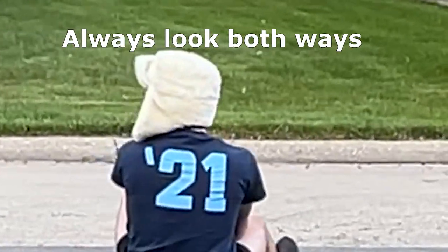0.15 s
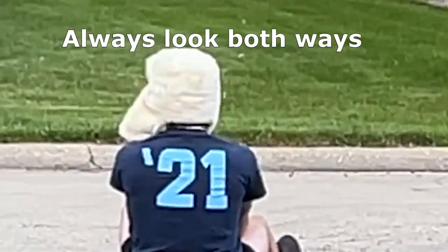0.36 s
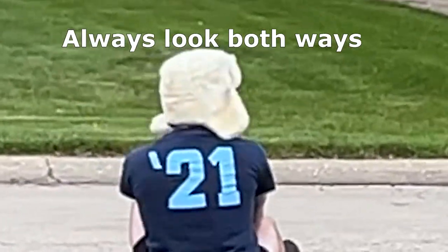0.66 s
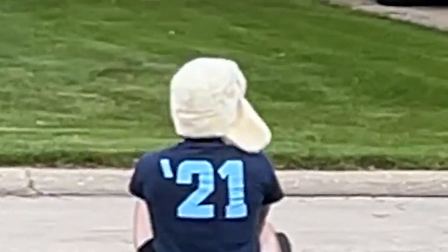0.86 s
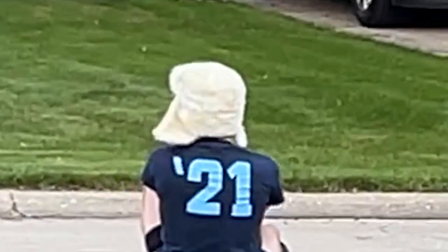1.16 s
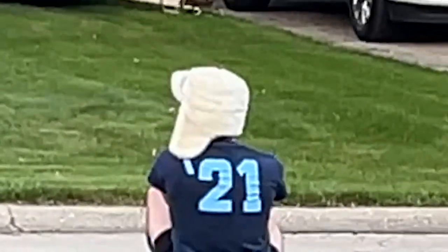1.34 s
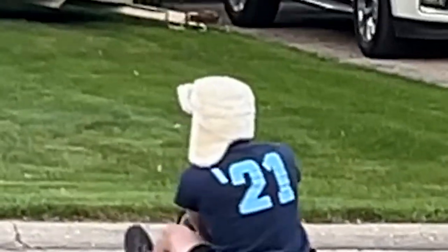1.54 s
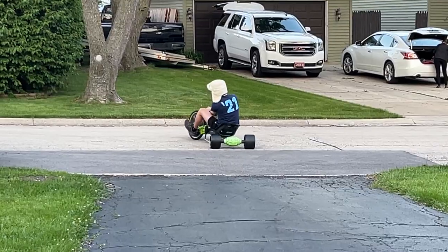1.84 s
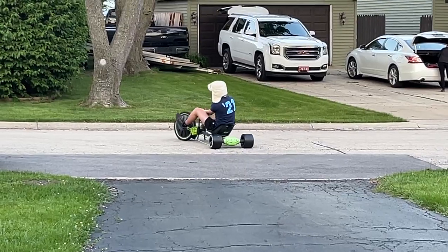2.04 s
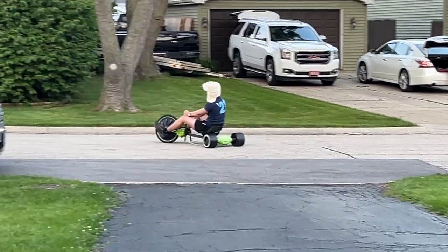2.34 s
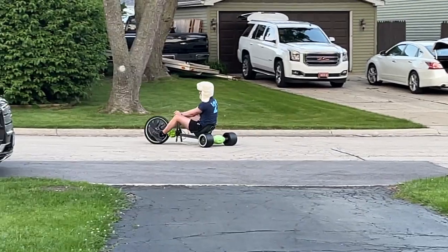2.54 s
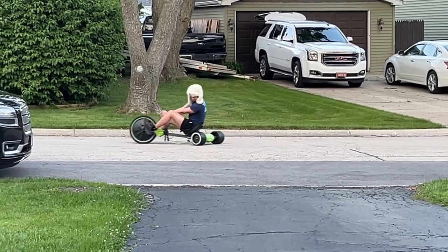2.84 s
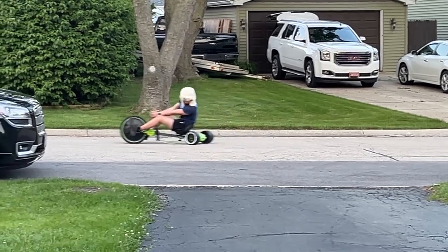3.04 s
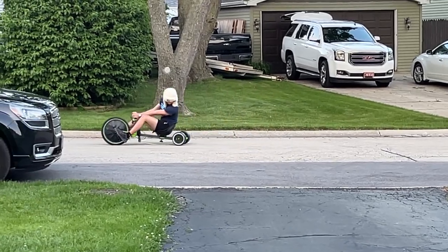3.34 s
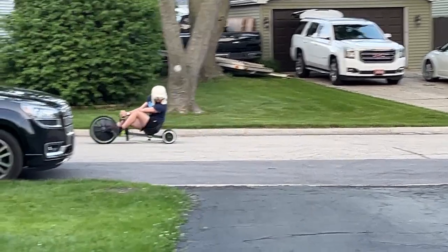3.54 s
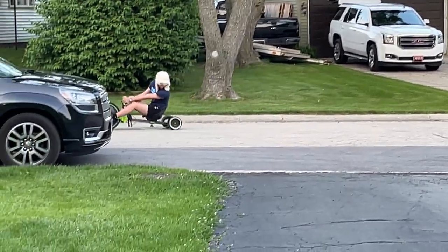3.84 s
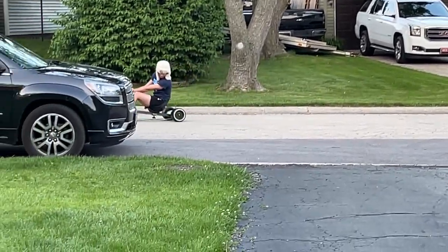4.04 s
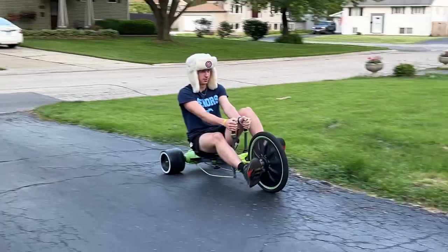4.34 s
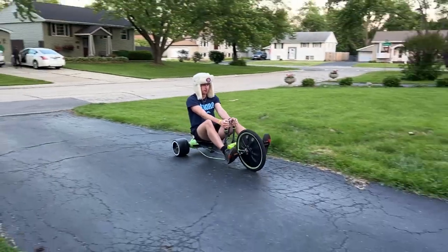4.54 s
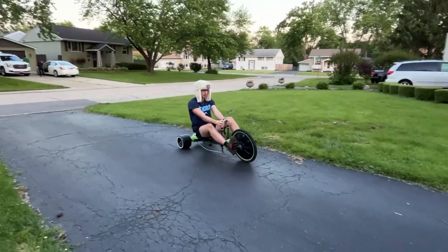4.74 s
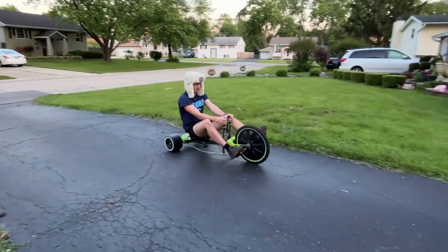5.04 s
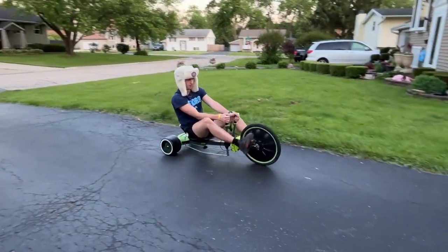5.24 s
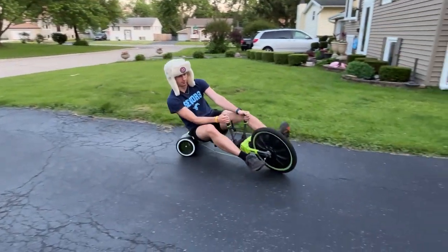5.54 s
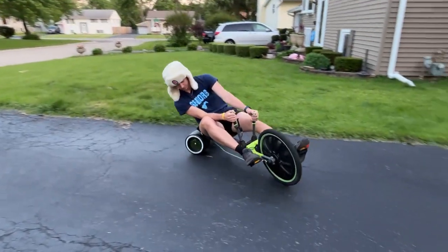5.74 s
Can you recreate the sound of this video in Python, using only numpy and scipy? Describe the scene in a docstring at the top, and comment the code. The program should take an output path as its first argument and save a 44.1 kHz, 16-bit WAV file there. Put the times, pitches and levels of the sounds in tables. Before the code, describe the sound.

Open air on a paved suburban street, heard in stereo over a dull, steady distant hush. From 0 s hard hollow plastic wheels roll with a gritty grind, stones ticking and snapping, one sharp crack at 0.3 s. A short skid with woody knocks comes around 0.8 s, more cracks around 1.3-1.6 s, and juddering scrapes with knocks at 1.8-2.3 s. The wheels then recede. Low gusts thump the microphone from 2.3 to 3.2 s, strongest near 3 s. A faint high rubbing squeak appears around 3.3 s, a bright plastic knock at 3.46 s, a hollow thump at 3.84 s, then near quiet. At 4.37 s the sound abruptly becomes close and loud: rough wheel roar, rattling frame and seat, scraping bursts near 4.8 and 5.0 s, hard cracks around 5.1 and 5.4 s. Hollow booming thumps and skidding grow, flattening into distortion until the end at about 5.9 s.

```python
"""On a paved street a low trike with hollow plastic wheels rolls away while gusts buffet the microphone.
Then, suddenly close, it grinds and skids through a turn on an asphalt driveway and overloads the microphone.
Random contacts ring the wheel shells into a roar, and patches of sand crunch; short noise bursts make
stones crack and wheel walls knock. Decaying tones make the wheel cavities thump, and low noise the wind."""
import sys
import numpy as np
from scipy import signal
from scipy.fft import rfft, irfft, next_fast_len
from scipy.io import wavfile
from scipy.ndimage import uniform_filter1d

SR = 44100
rng = np.random.default_rng(int(sys.argv[2]) if len(sys.argv) > 2 else 0)


def transcribe(signal):
    """Save signal, clipped to [-1, 1], as a 16-bit WAV file at the path in sys.argv[1]."""
    frames = np.atleast_2d(signal).T
    limited = np.clip(frames, -1, 1)
    pcm = np.round(limited * 32767).astype(np.int16)
    wavfile.write(sys.argv[1], SR, pcm)


N = 259660
TIME = np.arange(N) / SR
SIZE = next_fast_len(N + 16000)   # transform length, with spare room after the sound
CLOSE_S = 4.366   # the trike is close from here on

# Plain rolling of the wheel walls along the street. Each row: time in seconds, level in dB.
STREET_ROLL = [(0, -28.5), (0.7, -32.5), (1.05, -34), (1.6, -33), (1.78, -35.5), (2.35, -40.5),
               (2.62, -39.5), (3.3, -40.5), (4.35, -45)]
# Plain rolling of the wheel walls on the driveway. Each row: time in seconds, level in dB.
DRIVEWAY_ROLL = [(4.37, -24.5), (4.68, -25), (4.95, -29), (5.25, -18), (5.46, -18), (5.58, -35),
                 (5.69, -22), (5.87, -14)]
# Skids of a wheel and crunching patches of sand. Each row: time at its height in seconds,
# length in seconds, grinding level in dB, grit relative to the grinding in dB.
SKIDS_AND_SAND = [(0.11, 0.027, -22.5, -8), (0.39, 0.13, -29.5, -3.5), (0.61, 0.12, -29, -5),
                  (0.83, 0.12, -20, -9), (1.18, 0.084, -30.5, -12), (1.358, 0.06, -28.5, -11),
                  (1.878, 0.044, -21, -13.5), (2.1, 0.12, -19, -17), (1.96, 0.07, -29.5, -36),
                  (2.303, 0.094, -27.5, -21), (3.24, 0.15, -42, 0.5), (3.49, 0.13, -46.5, 7),
                  (4.12, 0.17, -54.5, 8), (4.587, 0.029, -22, -8.5), (4.76, 0.062, -16, -15.5),
                  (4.856, 0.078, -10.5, -11.5), (5.027, 0.12, -14.5, -8), (5.175, 0.063, -15, -6.5),
                  (5.403, 0.045, -7.5, -4.5), (5.526, 0.048, -7.5, -9), (5.621, 0.053, -12, -11.5),
                  (5.787, 0.14, -13, -5.5)]
# A faint rubbing squeak while the trike coasts. Each row: time in seconds, level in dB.
SQUEAK_LEVEL = [(2.9, -56), (3.12, -45.5), (3.3, -39), (3.46, -43), (3.62, -51), (3.8, -59)]
# A wheel wall jolted by a bump. Each row: start in seconds, peak in dB, pitch in Hz,
# time to ring down by 60 dB in seconds.
WALL_JOLTS = [(0.739, -12.5, 1090, 0.05), (0.777, -11.5, 1750, 0.039), (0.816, -7, 1310, 0.032),
              (0.833, -9, 1390, 0.05), (0.858, -13, 1250, 0.038), (0.898, -13, 1000, 0.038),
              (1.169, -15, 1470, 0.058), (1.334, -16.5, 1440, 0.13), (1.38, -20, 1400, 0.065),
              (1.459, -18, 1400, 0.053), (1.49, -18, 1240, .025), (1.835, -10.5, 1340, 0.045),
              (1.923, -15, 1330, 0.041), (2.013, -12, 1350, 0.047), (2.046, -12.5, 1330, 0.056),
              (2.087, -9, 1330, 0.049), (2.143, -12.5, 1400, 0.022), (2.216, -13.5, 1500, 0.03),
              (2.245, -17, 1320, 0.087), (2.452, -22.5, 1310, 0.067), (3.839, -28, 1350, 0.028),
              (3.867, -27, 1600, 0.021), (4.693, -10, 1140, 0.022), (4.746, -5.5, 1130, 0.03),
              (4.806, -9, 1360, 0.03), (4.8362, -10, 1240, 0.019), (4.868, -7, 1140, 0.022),
              (4.996, -1, 1080, 0.046), (5.049, 1.5, 1130, 0.045), (5.064, -6, 2580, 0.023),
              (5.105, -7.5, 1170, 0.1), (5.237, -9, 1800, 0.02), (5.297, -10, 2050, 0.054),
              (5.456, -10, 1080, 0.034), (5.495, -1, 2040, 0.025), (5.5189, -1, 1810, 0.022),
              (5.532, -1, 1850, 0.026), (5.71, -7.5, 1160, 0.11), (5.731, -5, 1150, 0.026),
              (5.7869, 0, 2160, 0.052)]
# The air in a hollow wheel thumps as it drops into a dip. Each row: start in seconds, peak in dB,
# pitch in Hz, time to ring down by 60 dB in seconds.
CAVITY_THUMPS = [(0.106, -17, 450, 0.058), (0.861, -12, 480, 0.034), (2.1, -16.5, 471, 0.076),
                 (3.466, -20.5, 377, 0.08), (3.837, -18.5, 189, 0.075), (4.411, -13, 460, 0.02),
                 (4.506, -11.5, 332, 0.029), (4.856, -6.5, 222, 0.024), (5.023, -11, 474, .035),
                 (5.172, -11, 305, 0.048), (5.242, -5.5, 434, 0.029), (5.368, -5.5, 443, 0.033),
                 (5.392, -8, 406, 0.038), (5.422, -9, 390, 0.041), (5.441, -4.5, 362, 0.073),
                 (5.496, -5.5, 295, 0.041), (5.654, -8.5, 267, 0.032), (5.707, -11, 314.4, 0.13),
                 (5.745, -2, 414, 0.035), (5.777, -0.5, 357, 0.11), (5.852, 4.5, 458, 0.054),
                 (5.873, 0, 428, 0.07)]
# Stones cracking, and a plastic knock ringing near 2.2 kHz at 3.463 s. Each row: start in seconds, peak in dB,
# # pitch in Hz, lift of that pitch in dB.
CRACKS_AND_KNOCK = [(0.0084, -4.5, 1750, 9.5), (0.257, -17.5, 2700, -8), (0.3102, 3.5, 3060, 12.5),
                    (0.345, -15.5, 3900, 4), (0.604, -19, 3260, 9), (0.856, -9.5, 2250, 15),
                    (1.097, -24, 3500, 7), (1.149, -17, 2600, 9), (1.176, -15.5, 2680, 12.5),
                    (1.3277, -10, 4830, 11), (1.4562, -12.5, 3130, 8), (1.4893, -12.5, 4640, 8),
                    (1.5396, -10.5, 3500, 5), (1.611, -13.5, 3500, 6), (1.651, -25, 4000, 10),
                    (1.74, -21, 2500, 1), (2.1943, -14, 2660, 9), (2.451, -19, 7500, 12),
                    (3.053, -24.5, 2200, 3), (3.23, -20.5, 2150, 9), (3.463, -8, 2200, 15.5),
                    (3.7584, -24.5, 4460, 13), (4.131, -30.5, 2160, 10), (4.4877, 1, 4920, 16),
                    (4.5825, -6, 2800, 10), (4.909, -1.5, 3970, 7), (5.0945, 1, 2290, 4),
                    (5.153, 2, 4900, 11.5), (5.1727, 2, 2020, 13), (5.406, 4.5, 4540, 18.5),
                    (5.408, 6, 2360, 12), (5.7291, 0.5, 7000, 5), (5.75, 0, 2700, 11), (5.863, -3, 4070, 7)]
# The breeze, freshening and then dropping to a lull. Each row: time in seconds, level in dB.
BREEZE_LEVEL = [(0, -30.5), (2.2, -29.5), (2.75, -24), (2.9, -18.5), (3.2, -17.5), (3.3, -33.5), (4.3, -34),
                (4.4, -31), (5.88, -27.5)]
# Low thumps at the microphone: gusts, and one late bump of the trike. Each row: start in seconds,
# peak in dB, time for the ring to fall by 60 dB in seconds.
LOW_THUMPS = [(2.302, -6, 0.041), (2.381, -11.5, 0.037), (2.459, -11, 0.051), (2.693, -17, 0.042),
              (2.754, -11.5, 0.03), (2.855, -6, 0.047), (2.888, -7.5, 0.028), (2.92, -5, 0.031),
              (2.996, -10, 0.027), (3.05, -5.5, 0.038), (3.105, -17.5, 0.033), (3.195, -19.5, 0.053),
              (3.912, -15.5, 0.033), (5.487, -10, 0.043)]

# Tone of the wheel noise far away. Each row: frequency in Hz, strength in dB per Hz.
FAR_WHEEL_COLOUR = [(88, -46), (150, -22), (388, -6), (471, -3.5), (736, -4.5), (1340, -7), (1660, -4.5),
                    (2650, -15.5), (5030, -27), (6860, -32), (8330, -35), (11100, -40.5), (15500, -53)]
# Tone of the wheel noise close by. Each row: frequency in Hz, strength in dB per Hz.
NEAR_WHEEL_COLOUR = [(55, -35), (95, 14), (150, 4.5), (460, -3), (700, -4), (900, -7.5), (1080, -5),
                     (1560, -8), (2030, -10.5), (2990, -15), (3740, -17.5), (5400, -23), (6890, -24),
                     (13200, -32.5), (15600, -51)]
# Wheel-shell resonances far away. Each row: frequency in Hz, width in Hz, lift in dB.
FAR_SHELL_MODES = [(450, 55, 10.5), (1054, 190, 8), (1380, 115, 4.5), (1510, 110, 3), (2200, 150, 2.5),
                   (2760, 560, 3.5), (3430, 660, 2.5)]
# Wheel-shell resonances close by. Each row: frequency in Hz, width in Hz, lift in dB.
NEAR_SHELL_MODES = [(303, 61, 4), (461, 28, 5), (1086, 68, 7.5), (1270, 44, 4), (1808, 79, 7),
                    (2040, 150, 5.5), (2370, 85, 3.5), (2930, 160, -5.5), (3640, 96, 3.5), (4290, 90, 2.5),
                    (4880, 130, 6.5)]
# Tone of a wheel wall being knocked. Each row: frequency in Hz, strength in dB per Hz.
KNOCK_COLOUR = [(40, -42), (150, -18.5), (450, -7.5), (800, -13.5), (1200, -3), (1650, -6), (2500, -8),
                (3400, -25.5), (9000, -37.5), (15000, -50)]
# Tone of a sharp crack. Each row: frequency in Hz, strength in dB per Hz.
SNAP_COLOUR = [(60, -31), (300, -4), (1200, -4), (2500, 3.5), (4800, -6), (7000, -4), (8500, -11.5),
               (12500, -12.5), (16000, -24)]
# Tone of the breeze at the microphone. Each row: frequency in Hz, strength in dB per Hz.
BREEZE_COLOUR = [(15, -61), (25, -24), (49, -4), (72, 2), (132, -4.5), (222, -20), (300, -27), (390, -52),
                 (660, -120)]
# Tone of the distant hush. Each row: frequency in Hz, strength in dB per Hz.
HUSH_COLOUR = [(41, -44), (70, -25.5), (126, 1.5), (647, -10.5), (1040, -19), (4460, -38.5), (5220, -39),
               (12300, -54), (15000, -66)]

# Lead of the left microphone port, far ride. Each row: frequency in Hz, lead in radians before its limit.
FAR_PORT_LEAD = [(100, 32), (1000, -1.5), (1900, 0.47), (3100, 0.46), (4900, -0.12), (5800, -1), (6700, -1),
                 (8400, -3), (10000, -5), (12000, -5.5), (15000, -9)]
# Lead of the left microphone port, close ride. Each row: frequency in Hz, lead in radians before its limit.
NEAR_PORT_LEAD = [(100, -0.3), (2200, 0.46), (3200, 2.5), (4500, -1.55), (7000, -2.5), (10000, -4),
                  (11200, -2), (14000, 3)]
# Left level over right level, far ride. Each row: frequency in Hz, difference in dB.
FAR_PORT_BALANCE = [(100, 0.5), (1000, -1), (1500, -5), (2000, -2), (4000, 0), (15000, 0)]
# Left level over right level, close ride. Each row: frequency in Hz, difference in dB.
NEAR_PORT_BALANCE = [(100, -0.5), (1100, -0.5), (2000, -5), (2650, -7), (3300, 8), (3900, 11), (5300, 1),
                     (7000, 11), (9600, -2), (14000, 0.5)]
# Scattered sound against direct sound, far ride. Each row: frequency in Hz, level in dB.
FAR_PORT_SCATTER = [(100, -14), (600, -13.5), (1600, -7.5), (2300, -22), (5000, -28), (15000, -22)]
# Scattered sound against direct sound, close ride. Each row: frequency in Hz, level in dB.
NEAR_PORT_SCATTER = [(100, -44), (350, -17), (900, -14.5), (2000, -9.5), (3000, -7.5), (9000, -0.5),
                     (12000, 4)]

SWELL_RISE_SHARE, SWELL_EDGE = 0.5, 1.52   # part of a skid or sand patch spent building up; flank steepness
SKID_ROAR_DB = -5   # the even roar of a skid, relative to its grinding level
PEBBLES_PER_S, PEBBLE_DB, PEBBLE_SPREAD_DB = 10, 4.5, 5.5   # peaks over the rolling level, give or take
PEBBLE_HZ, PEBBLE_LIFT_DB = 3250, 4.5   # middle of the pebble pitches, and the lift at each pitch
GRAVEL_END_S = 2.3   # no random pebbles after this time
HUSH_DB = -36


def rolling(gains, colour, modes, contacts_per_s, spread_db, chatter_db, grit_per_s, grit_spread_db,
            grit_chatter_db):
    """Paving grains drum on the hollow wheels, which chatter as they grip and slip; sand crunches on top."""
    boom, grind, grit = gains
    slip = 0.33 * drift(170) + 0.96 * drift(60)
    contacts = grains(contacts_per_s, spread_db) * from_db(chatter_db * slip)
    shell = body(contacts, colour, modes)
    sand_contacts = grains(grit_per_s, grit_spread_db) * from_db(grit_chatter_db * slip)
    sand = body(sand_contacts, colour, modes)
    cavity = steady(band(shell, 147.4, 758, order=3))
    wall = steady(band(shell, 706, 2970, order=3))
    crunch = steady(band(sand, 3040, 20600, order=3))
    return boom * cavity + grind * wall + grit * crunch


def effort(curve, stretch, boom_db, boom_follows, skid_boom_db, grit_db, grit_follows):
    """Boom and grit follow the wall's rolling level by their own shares; skids and sand add to all three."""
    roll_db, = in_time(curve)
    mean_db = np.mean([db for _, db in curve])
    swing_db = roll_db - mean_db
    skid, sand = skids_and_sand(*stretch)
    plain_boom = from_db(mean_db + boom_db + boom_follows * swing_db) ** 2
    boom = plain_boom + from_db(skid_boom_db) ** 2 * skid
    grind = from_db(roll_db) ** 2 + from_db(SKID_ROAR_DB) ** 2 * skid
    grit = from_db(mean_db + grit_db + grit_follows * swing_db) ** 2 + sand
    return np.sqrt([boom, grind, grit])


def skids_and_sand(start_s, end_s):
    """Each skid or sand patch swells and dies away; gives the power of grinding and grit over a stretch."""
    grind, grit = np.zeros((2, N))
    for s, length_s, level_db, sand_db in SKIDS_AND_SAND:
        if start_s <= s < end_s:
            before = (s - TIME) / SWELL_RISE_SHARE
            after = (TIME - s) / (1 - SWELL_RISE_SHARE)
            away = np.maximum(before, after) / length_s
            power = from_db(level_db) ** 2 * np.exp(-np.minimum(away, 10) ** SWELL_EDGE)
            grind += power
            grit += power * from_db(sand_db) ** 2
    return grind, grit


def scrape(stretch, level_db, slips_per_s, spread_db, hz, width_hz, lift_db, judder_db):
    """A wheel catches and lets go in juddering runs of slips that ring its wall's main resonance."""
    power, _ = skids_and_sand(*stretch)
    runs = from_db(judder_db * np.tanh(drift(220)))
    slips = body(grains(slips_per_s, spread_db) * runs, KNOCK_COLOUR, [(hz, width_hz, lift_db)])
    return from_db(level_db) * np.sqrt(power) * steady(slips, span_s=0.026)


def squeak(hz, width_hz, wander, upper_hz, upper_db, catches_per_s, catch_db):
    """Rubbing plastic catches in short fits and sings weakly in two resonances whose pitch wanders."""
    bend = 1 + wander * drift(catches_per_s)
    fitful = from_db(catch_db * np.tanh(2 * drift(catches_per_s)))
    voices = []
    for pitch_hz in (hz, upper_hz):
        phase = 2 * np.pi * np.cumsum(pitch_hz * bend) / SR
        voices.append(drift(width_hz) * np.sin(phase))
    lower, upper = voices
    song = fitful * (lower + from_db(upper_db) * upper)
    return from_db(in_time(SQUEAK_LEVEL)[0]) * song / rms(song)


def rattle(gain, level_db, knocks_per_s, spread_db, low_hz, high_hz, cycles, count=96):
    """Seat, frame and hubs knock at uneven intervals as the trike shakes, each at a pitch of its own."""
    out = np.zeros((2, N))
    chance = rng.random((count, 3))
    starts = CLOSE_S + np.cumsum(2 * chance[:, 0]) / knocks_per_s
    for s, (_, weakness, place) in zip(starts, chance):
        hz = low_hz * (high_hz / low_hz) ** place
        knock = burst(cycles / hz, tail_db=-30, tail_t60=.05)
        knock = body(knock, KNOCK_COLOUR, [(hz, 0.2 * hz, 18)])
        if s < TIME[-1]:
            add(out, s, from_db(level_db - spread_db * weakness) * unit_peak(knock))
    return gain * out


def minor_modes(width_hz, spread_db, count=90):
    """Frame and seat add many weak, narrow resonances, each a random lift or dip."""
    return [(hz, width_hz, spread_db * rng.standard_normal()) for hz in rng.uniform(1506, 12100, count)]


def jolts():
    """Bumps give the wheel wall a hard, woody knock."""
    out = np.zeros((2, N))
    for s, peak_db, hz, ring_s in WALL_JOLTS:
        modes = FAR_SHELL_MODES if s < CLOSE_S else NEAR_SHELL_MODES
        knock = burst(ring_s, tail_db=-27, tail_t60=0.12)
        knock = body(knock, KNOCK_COLOUR, modes + [(hz, 0.19 * hz, 9)])
        add(out, s, from_db(peak_db) * unit_peak(knock))
    return out


def thumps(attack_s, rattle_db):
    """The wheel cavity rings briefly at one pitch, with a little rattle around it."""
    out = np.zeros((2, N))
    t = TIME[:SR // 6]
    for s, peak_db, hz, ring_s in CAVITY_THUMPS:
        swell = (1 - np.exp(-t / attack_s)) ** 2 * from_db(-60 * t / ring_s)
        noise = band(rng.standard_normal((2, len(t))), 0.39 * hz, 1.28 * hz)
        ring = np.sin(2 * np.pi * hz * t) + from_db(rattle_db) * noise / rms(noise)
        add(out, s, from_db(peak_db) * ring * swell / swell.max())
    return out


def cracks_and_knock():
    """Stones snap and plastic clacks or knocks at a pitch set by where it is hit; far ones echo longer."""
    out = np.zeros((2, N))
    for s, peak_db, hz, lift_db in CRACKS_AND_KNOCK + pebbles():
        if s < CLOSE_S:
            snap = burst(0.0079, tail_db=-17.5, tail_t60=0.065)
            modes = [(hz, 0.33 * hz, lift_db), (4200, 1500, 2.5), (11500, 5000, -1.5)]
        else:
            snap = burst(0.011, tail_db=-26, tail_t60=0.061)
            modes = [(hz, 0.16 * hz, lift_db), (2400, 2000, -3), (7000, 1500, 2), (11500, 5000, 4)]
        add(out, s, from_db(peak_db) * unit_peak(body(snap, SNAP_COLOUR, modes)))
    return out


def pebbles(count=32):
    """Small stones lie at random on the first stretch, ticking in step with the rolling level: crack rows."""
    chance = rng.uniform(-1, 1, (count, 3))
    starts = np.cumsum(1 + chance[:, 0]) / PEBBLES_PER_S
    roll_db = np.interp(starts, *np.transpose(STREET_ROLL))
    peak_db = roll_db + PEBBLE_DB + PEBBLE_SPREAD_DB * chance[:, 1]
    hz = PEBBLE_HZ * 2 ** (0.22 * chance[:, 2])
    return [(*row, PEBBLE_LIFT_DB) for row in zip(starts, peak_db, hz) if row[0] < GRAVEL_END_S]


def wind_and_low_thumps(apart_db, thump_hz, flutter_db):
    """Low turbulence nearly alike at both ports, and single low thumps: gusts and one late bump."""
    strength_db, = in_time(BREEZE_LEVEL)
    shared, apart = steady(body(rng.standard_normal((2, N)), BREEZE_COLOUR), span_s=0.079)
    flow = shared + from_db(apart_db) * np.array([apart, -apart])
    # light air holds only small eddies, so its deepest bass fades out
    depth = np.clip((strength_db + 34.5) / 4, 0, 1)
    small_eddies = band(flow, 100, 540, order=4)
    out = (depth * flow + (1 - depth) * small_eddies) * from_db(strength_db)
    t = TIME[:SR // 6]
    for s, peak_db, ring_t60 in LOW_THUMPS:
        swing = np.sin(2 * np.pi * thump_hz * np.exp(rng.normal(0, 0.021)) * t)
        flutter = band(rng.standard_normal((1, len(t))), 106, 283)
        thump = swing + from_db(flutter_db) * flutter / rms(flutter)
        thump = t ** 2 * from_db(-60 * t / ring_t60) * thump
        add(out, s, from_db(peak_db) * thump / np.abs(thump).max())
    return out


def distant_hush():
    """Distant suburban hush: steady noise, dull in tone."""
    air = band(body(rng.standard_normal((2, N)), HUSH_COLOUR), 87, 16000)
    return air * from_db(HUSH_DB) / rms(air)


def ground_bounce(x, gain, delay_s, sway):
    """An echo off the paving whose path keeps changing, so the colour wanders."""
    at = np.arange(N)
    lag = SR * delay_s * np.exp(sway * drift(9))
    echo = np.array([np.interp(at - lag, at, row) for row in x])
    return (x + gain * echo) / np.sqrt(1 + gain ** 2)


def ports(x, phase, balance, scatter):
    """Direct sound reaches two ports with its own lead and shading; scattered sound differs between them."""
    hz = np.fft.rfftfreq(SIZE, 1 / SR)
    side = np.array([[.5], [-.5]])   # left, right
    direct, scattered = rfft(x, SIZE)
    wet = from_db(at_hz(scatter, hz))
    reach = (hz / 1400) ** 1.2   # long waves meet both ports almost in step
    lead = np.clip(at_hz(phase, hz), -reach, reach)
    shading = from_db(side * at_hz(balance, hz))
    path = np.exp(1j * side * lead) * shading / np.sqrt(1 + wet ** 2)
    return irfft((direct + 2 * side * wet * scattered) * path, SIZE)[:, :N]


def grains(per_s, spread_db):
    """Random contacts of unequal strength, in two rows: direct and scattered sound."""
    born = rng.random((2, N)) < per_s / SR
    count = born.sum()
    sign = rng.choice([-1, 1], 2 * N)[:count]
    strength = np.minimum(rng.exponential(1, 2 * N)[:count], 5)
    out = np.zeros((2, N))
    out[born] = sign * from_db(spread_db * strength)
    return out


def burst(t60, tail_db, tail_t60, size=4096):
    """A quickly swelling and dying run of tiny fractures, with a faint rattle after it."""
    t = TIME[:size]
    swell = 1 - np.exp(-t / 0.00055)
    fading = from_db(-60 * t / t60) + from_db(tail_db - 60 * t / tail_t60)
    return rng.standard_normal((2, size)) * swell * fading


def body(x, colour, modes=(), size=8192):
    """Ring x through a body with a broad colour and resonances on it."""
    hz = np.fft.rfftfreq(size, 1 / SR)
    db = at_hz(colour, hz) + sum(lift / (1 + (2 * (hz - f) / width) ** 2) for f, width, lift in modes)
    cepstrum = irfft(np.log(from_db(db)))
    cepstrum[1:size // 2] *= 2   # minimum phase: nothing sounds before its cause
    cepstrum[size // 2 + 1:] = 0
    ring = irfft(np.exp(rfft(cepstrum)))
    return signal.oaconvolve(x, ring[None], axes=1)[:, :x.shape[1]]


def steady(x, span_s=0.075):
    """Hold the short-term level near 1 and keep the fast grain."""
    power = uniform_filter1d(x ** 2, int(span_s * SR))
    return x / np.sqrt(power + 1e-6 * np.mean(x ** 2))


def unit_peak(x, span_s=0.0018):
    """Scale a blow so that the loudest moment of its direct sound swings about 1."""
    return x / np.sqrt(2 * uniform_filter1d(x[0] ** 2, int(span_s * SR)).max())


def add(track, s, sound):
    """Lay a sound into a track at time s."""
    start = max(int(s * SR), 0)
    track[:, start:start + sound.shape[1]] += sound[:, :N - start]


def drift(rate):
    """Random wandering, slow or fast: straight lines between chance values, rate of them per second."""
    knots = np.arange(0, 7, 1 / rate)
    return np.interp(TIME, knots, rng.standard_normal(4096)[:len(knots)])


def band(x, low_hz, high_hz, order=2):
    """Keep the sound between two frequencies (Butterworth band-pass)."""
    edges = [low_hz, min(high_hz, .47 * SR)]
    return signal.sosfilt(signal.butter(order, edges, "band", fs=SR, output="sos"), x)


def in_time(rows):
    """Each column of a curve at every sample."""
    s, *columns = np.transpose(rows)
    return [np.interp(TIME, s, c) for c in columns]


def at_hz(points, hz):
    """Read a spectrum on a log-frequency axis."""
    f, value = np.transpose(points)
    return np.interp(np.log(hz + 1), np.log(f), value)


def from_db(db):
    """Decibels to gain."""
    return 10 ** (np.asarray(db) / 20)


def rms(x):
    """Root mean square: the average strength of a sound."""
    return np.sqrt(np.mean(x ** 2) + 1e-20)


def scene():
    """The far ride along the street, then the close turn on the driveway."""
    close = np.clip((TIME - CLOSE_S) / 0.00088, 0, 1)
    street_span, driveway_span = (0, CLOSE_S), (CLOSE_S, N / SR)
    air = distant_hush()
    frame = minor_modes(width_hz=64, spread_db=2.16)
    coasting = effort(STREET_ROLL, street_span, boom_db=1.0, boom_follows=0.55, skid_boom_db=-2.0,
                      grit_db=-9.0, grit_follows=1.12)
    turning = effort(DRIVEWAY_ROLL, driveway_span, boom_db=3.0, boom_follows=0.88, skid_boom_db=-4.0,
                     grit_db=-5.5, grit_follows=1.28)

    far = rolling(coasting, FAR_WHEEL_COLOUR, FAR_SHELL_MODES + frame, contacts_per_s=2500, spread_db=2.0,
                  chatter_db=2.0, grit_per_s=5000, grit_spread_db=3.5, grit_chatter_db=3.0)
    far += squeak(hz=2190, width_hz=200, wander=0.0218, upper_hz=4620, upper_db=-15.5,
                  catches_per_s=45, catch_db=7)
    far += scrape(street_span, level_db=-1.9, slips_per_s=750, spread_db=0.0, hz=1350, width_hz=370,
                  lift_db=12, judder_db=5)

    near = rolling(turning, NEAR_WHEEL_COLOUR, NEAR_SHELL_MODES + frame, contacts_per_s=1100, spread_db=2.0,
                   chatter_db=1.5, grit_per_s=1700, grit_spread_db=3.5, grit_chatter_db=4.5)
    near += scrape(driveway_span, level_db=-8.0, slips_per_s=300, spread_db=2.0, hz=1140, width_hz=400,
                   lift_db=7, judder_db=8)
    near += rattle(turning[1], level_db=7.5, knocks_per_s=50, spread_db=7, low_hz=653, high_hz=2360,
                   cycles=10.6)

    far = ground_bounce(far, gain=0.39, delay_s=0.001074, sway=0.38)
    near = ground_bounce(near, gain=0.35, delay_s=0.00172, sway=0.257)
    breeze_and_thumps = wind_and_low_thumps(apart_db=-17, thump_hz=80.6, flutter_db=-10.5)
    common = air + jolts() + thumps(attack_s=0.0018, rattle_db=-6.5) + cracks_and_knock()
    street = ports((far + common) * (1 - close), FAR_PORT_LEAD, FAR_PORT_BALANCE, FAR_PORT_SCATTER)
    driveway = ports((near + common) * close, NEAR_PORT_LEAD, NEAR_PORT_BALANCE, NEAR_PORT_SCATTER)
    return street + driveway + breeze_and_thumps


def record(dry):
    """Loud peaks flatten at full scale; the deepest bass and the top are cut."""
    limited = dry / (1 + dry ** 8) ** (1 / 8)
    thinned = signal.sosfilt(signal.butter(2, 28, "high", fs=SR, output="sos"), limited)
    return signal.sosfilt(signal.cheby2(14, 60, 16600, fs=SR, output="sos"), thinned)


dry = scene()
out = record(dry)
transcribe(out)
```